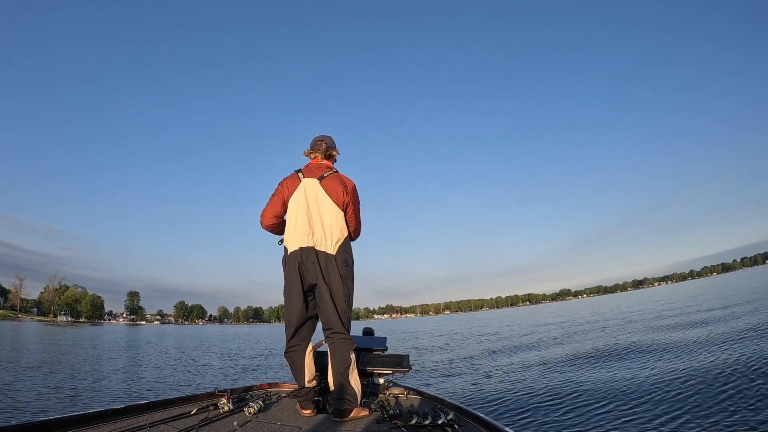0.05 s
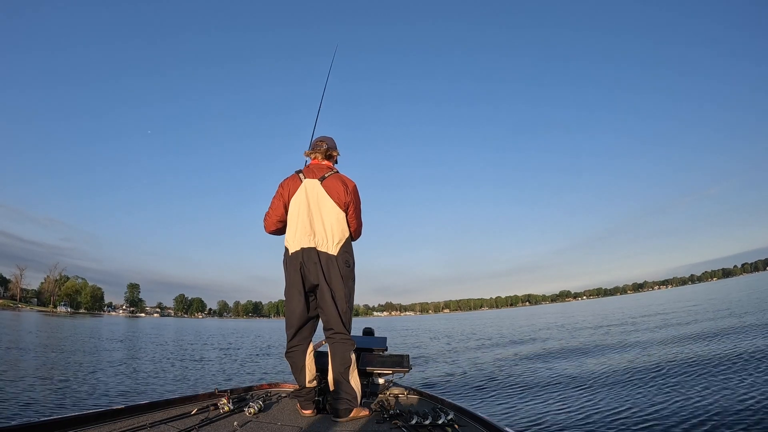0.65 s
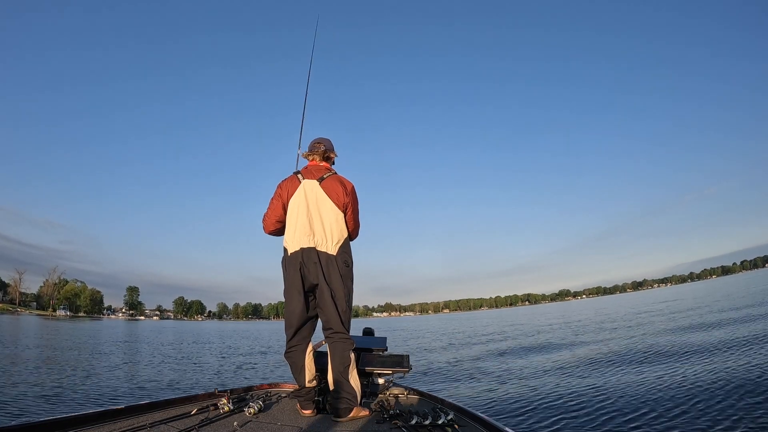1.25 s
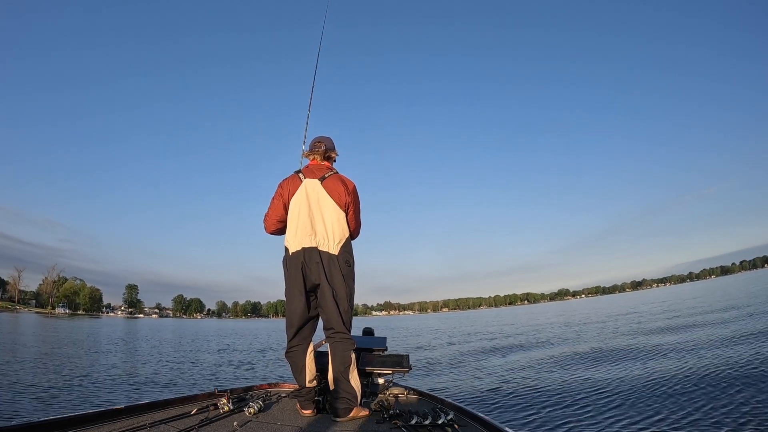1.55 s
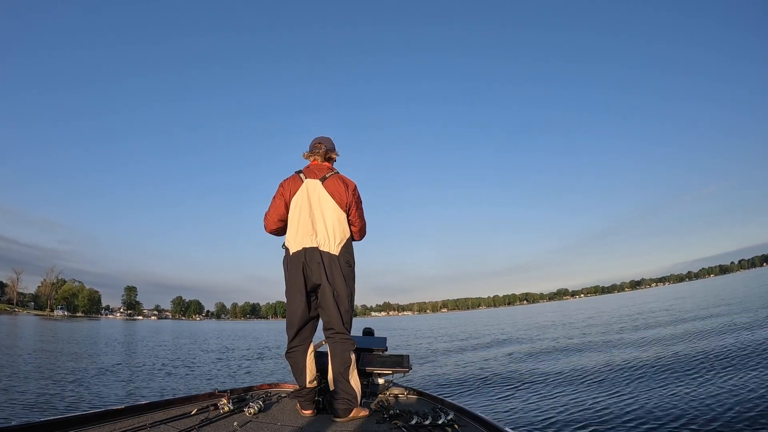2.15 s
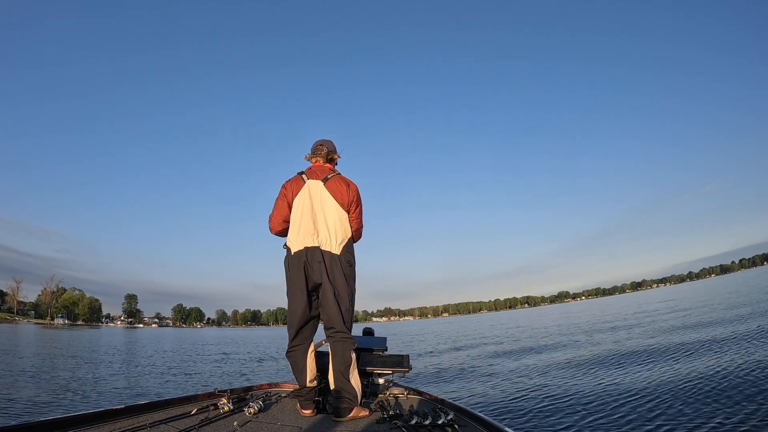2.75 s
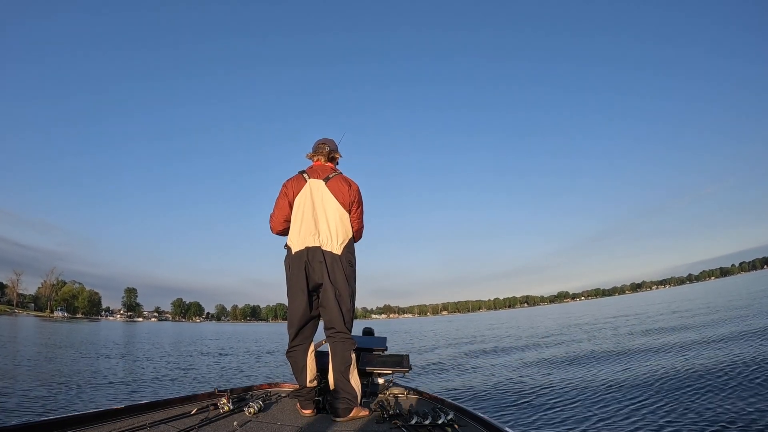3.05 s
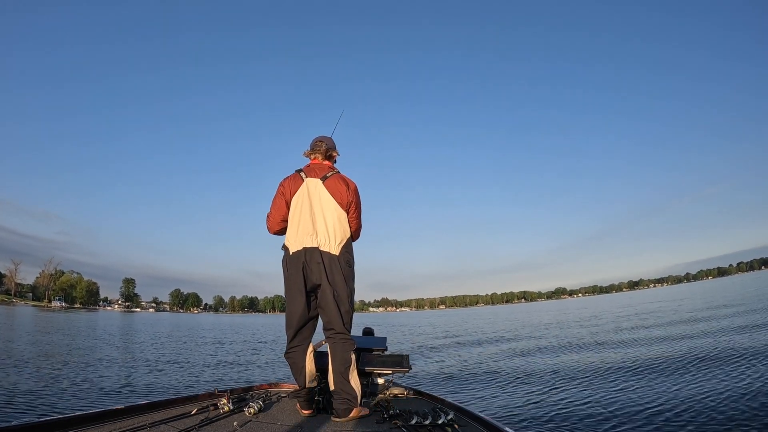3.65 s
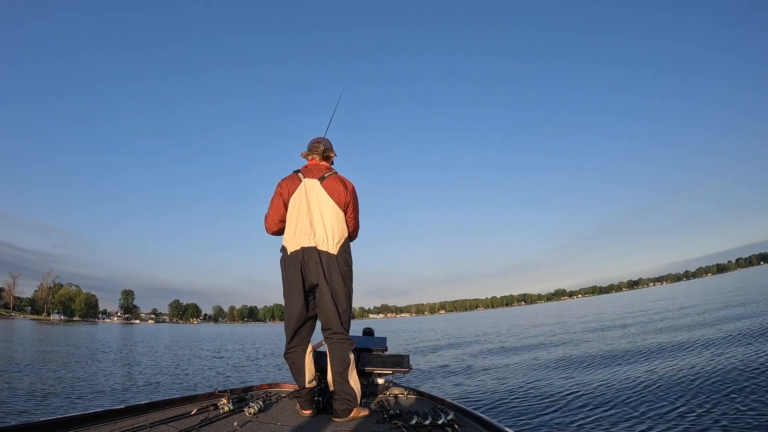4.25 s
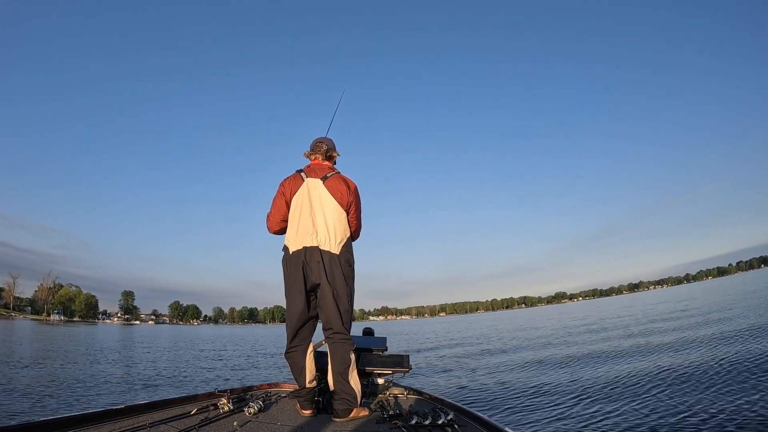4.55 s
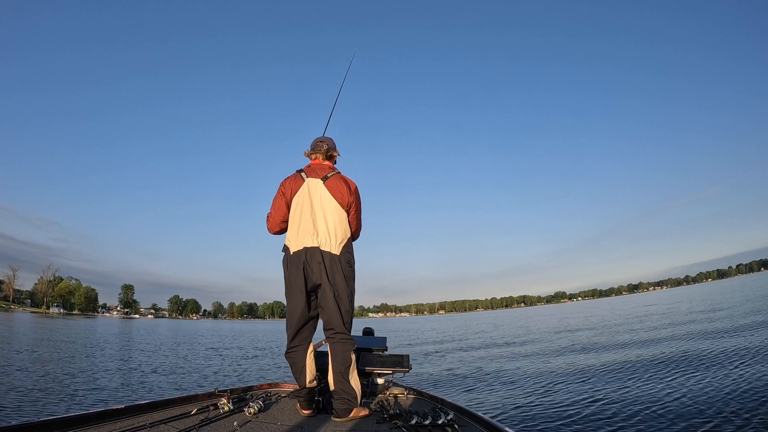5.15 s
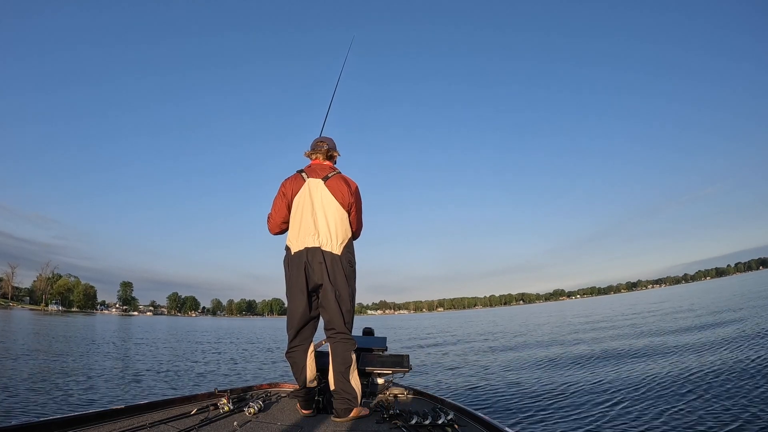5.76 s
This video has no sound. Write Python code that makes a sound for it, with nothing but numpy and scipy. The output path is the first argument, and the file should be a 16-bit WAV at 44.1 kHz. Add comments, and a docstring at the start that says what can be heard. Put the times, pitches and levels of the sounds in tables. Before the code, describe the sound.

An electric trolling motor hums with a low, throbbing tone while water rumbles beneath a small boat. Faint birds chirp and whistle from the shore. About halfway through, a dull thud and a hollow slosh hit the hull, followed by several more bumps as a fishing reel hisses softly in quick strokes. A small drip comes near the end. The microphone is on the boat, on a calm open lake.

```python
"""Trolling on a calm lake

An electric trolling motor hums under the bow of a small boat, its close tones beating in the hull.
Beneath it water rumbles and sloshes, with a few dull bumps and drips. An angler's reel hisses softly
in strokes as line slides onto the spool, and the tackle ticks. Behind it all lie an airy rush,
one far knock and small birds whose gliding whistles echo off the shore."""
import sys
import numpy as np
from scipy import signal
from scipy.fft import rfft, irfft
from scipy.io import wavfile

SR = 44100
rng = np.random.default_rng(int(sys.argv[2]) if len(sys.argv) > 2 else 0)


def transcribe(u):
    """Save the signal u as a 16-bit wav file named by the first command-line argument.

    u: samples, shape (n,) or (channels, n), limited to [-1, 1]; the rate is SR.
    q: integer samples, one column per channel.
    """
    v = np.clip(np.atleast_2d(u).T, -1, 1)
    q = np.round(v * 32767).astype(np.int16)
    wavfile.write(sys.argv[1], SR, q)


N = 264600
TIME = np.arange(N) / SR

# stereo image of the open air: (frequency [Hz], left-right likeness [0-1])
STEREO_LIKENESS = [(25, .87), (70, .99), (160, .994), (300, .978), (600, .82), (1500, .78), (4000, .6),
                   (9000, .6), (13000, .75)]
# colour of the airy bed: (frequency [Hz], relative level [dB])
RUSH_COLOUR = [(300, -8.5), (600, -5.5), (850, -1), (1100, 4), (1350, 4.5), (1600, -1.5), (1900, -4),
               (2500, -5.5), (3100, -13.5), (4000, -18), (5000, -20.5), (7500, -24), (8500, -41.5),
               (13000, -42.5)]
# colour of the rush that swells over it: (frequency [Hz], relative level [dB])
SWELL_COLOUR = [(400, -19), (700, 1), (1000, -0.5), (1300, 2.5), (1600, -2.5), (1850, -2), (2100, -6.5),
                (2450, -7), (3100, -21.5), (4500, -27.5), (8000, -40.5)]
# swells of that rush: (peak time [s], half width [s], level [dB])
RUSH_SWELLS = [(0.2, .27, -68), (4.1, 1.45, -65.3), (3.92, .27, -60.5), (4.35, .28, -65)]

# bouts of twittering on the shore: (peak time [s], half width [s], level [dB])
TWITTER_BOUTS = [(1.02, 0.085, -77), (1.42, .12, -83), (1.81, 0.034, -74.5), (2.02, .3, -87.5),
                 (2.38, .08, -82.5), (3.1, 0.044, -78), (5.5, 0.52, -80.5)]
# a nearer bird's arched chirps: (time of the top [s], rise [s], hold [s], fall [s], top pitch [Hz],
# relative level [dB], level change over the fall [dB])
NEAR_CHIRPS = [(0.568, 0.052, 0.014, 0.041, 4520, -70, 5.5), (1.266, 0.043, 0.015, 0.01, 4960, -83, -8.5),
               (1.283, .036, 0.0065, 0.017, 4560, -83, -3.5), (1.355, 0.042, 0.018, 0.02, 4580, -75.5, -4),
               (1.44, 0.036, 0, 0, 3980, -78, -2.5), (4.079, 0.024, 0.022, 0.024, 5300, -75.5, -17.5),
               (4.168, .036, 0, 0.006, 4450, -79, -3), (4.774, 0.048, 0.0058, 0.0044, 4900, -86.5, 0),
               (4.805, 0.019, .002, 0.027, 4270, -80, -8), (5.925, 0.0018, 0.0026, 0.03, 4120, -80.5, 5)]
# farther birds' slurs and pips: (time [s], length [s], first pitch [Hz], middle pitch [Hz],
# last pitch [Hz], relative level [dB])
FAR_SLURS = [(0.374, 0.09, 2415, 2257, 2050, -71.5), (0.875, 0.025, 2450, 2540, 2720, -78.5),
             (0.945, 0.085, 3280, 3220, 2850, -83), (0.966, 0.092, 2510, 2154, 2330, -72.5),
             (1.06, 0.072, 2770, 2480, 2440, -78.5), (1.318, 0.04, 3090, 2880, 2740, -83.5),
             (1.368, 0.077, 2730, 2134, 2510, -71.5), (1.482, 0.041, 2555, 2290, 2300, -71.5),
             (1.782, 0.027, 3210, 3400, 3780, -81.5), (1.787, 0.024, 2440, 2480, 2640, -71.5),
             (1.83, 0.042, 2610, 2395, 2380, -67.5), (1.844, 0.11, 3560, 3190, 2970, -83.5),
             (1.956, 0.052, 2565, 2350, 2350, -67.5), (2.01, 0.071, 2424, 2245, 2260, -74),
             (2.062, 0.034, 2860, 2970, 3110, -82), (2.132, 0.039, 2480, 2540, 2570, -77.5),
             (2.317, 0.045, 2330, 2130, 2070, -72.5), (2.33, 0.032, 2790, 2770, 2700, -78),
             (2.357, 0.05, 2660, 2627, 2640, -69), (2.397, 0.077, 2216, 2360, 2355, -76),
             (2.455, 0.089, 2430, 2204, 2260, -71.5), (3.075, 0.048, 3240, 3290, 3580, -81.5),
             (4.876, 0.093, 2850, 2800, 2750, -79), (4.887, 0.081, 2500, 2440, 2510, -77),
             (5.241, 0.033, 3550, 3740, 3750, -84), (5.33, 0.078, 2270, 2205, 2200, -78),
             (5.49, 0.04, 2584, 2230, 1900, -76), (5.531, 0.024, 3470, 3680, 3650, -80.5),
             (5.648, 0.017, 3400, 3570, 3760, -82), (5.765, 0.022, 3450, 3650, 3855, -82),
             (5.822, 0.038, 2630, 2370, 2260, -72.5), (5.856, 0.117, 2300, 2380, 2415, -80),
             (5.953, 0.058, 2760, 2350, 2280, -67)]
# resonances of the far knock: (frequency [Hz], bandwidth [Hz], t60 [s], level [dB])
KNOCK_MODES = [(1001, 40, 1.8, -67), (1144, 150, 0.42, -63)]

# drips and bubbles beside the hull: (time [s], starting pitch [Hz], t60 [s], level [dB])
BUBBLES = [(5.596, 1560, 0.06, -50), (5.613, 1130, 0.026, -58), (5.622, 1040, 0.044, -54)]
# ripples against the hull: (peak time [s], half width [s], pitch [Hz], bandwidth [Hz], level [dB])
HULL_SLOSHES = [(0.35, 0.56, 500, 99, -62.5), (2.7, 0.26, 380, 66, -51), (2.35, 0.28, 850, 190, -67.5),
                (3.15, 0.82, 680, 120, -68.5), (.42, 0.089, 1800, 340, -69.5), (3.3, .3, 1900, 700, -71.5),
                (3.89, 0.068, 1800, 320, -64.5), (5.03, 0.15, 1500, 800, -64.5)]
# colour of the water along the hull: (frequency [Hz], relative level [dB])
RUMBLE_COLOUR = [(8, -20), (20, 1), (55, 2), (110, -5.5), (165, -4), (200, -7), (235, -14), (290, -14),
                 (340, -21.5), (430, -24.5), (560, -32), (750, -44), (1200, -56.5), (3000, -90.5)]
# slow heaves of the boat: (peak time [s], half width [s], gain [dB])
BOAT_HEAVES = [(2.19, 0.13, -31.5), (3.6, 0.69, -39.5), (4.95, 0.16, -42.5), (5.75, 0.32, -36)]
# swells of the deep rumble: (peak time [s], half width [s], gain [dB])
RUMBLE_SWELLS = [(.22, 0.094, -44), (1.8, 0.062, -39.5), (2.2, 0.12, -42), (4.03, 0.098, -44),
                 (4.94, 0.13, -40.5), (5.52, 0.17, -39)]
# fader ride of the wash: (time [s], relative level [dB])
WASH_RIDE = [(0.3, -46.5), (2.59, -47.5), (3.03, -49), (4.54, -47), (5.73, -50.5), (5.77, -46.5),
             (5.9, -49.5)]
# dull bumps on the hull: (time [s], pitch [Hz], attack [s], level [dB])
HULL_BUMPS = [(2.67, 72, 0.019, -30.5), (2.696, 150, 0.012, -22.5), (2.733, 27.2, 0.033, -21.5),
              (3.353, 134, 0.0058, -22), (4.008, 159, 0.0038, -23.5), (4.457, 166.4, 0.012, -23.5),
              (4.905, 70.7, 0.012, -25.5), (4.91, 156, 0.0095, -24.5)]

# sharp ticks of the tackle: (time [s], centre frequency [Hz], t60 [s], level [dB])
TACKLE_TICKS = [(0.425, 5700, 0.018, -63), (1.217, 6300, .035, -71.5), (3.412, 3200, .028, -59),
                (4.468, 3400, .025, -58.5)]
# colour of slow-running line: (frequency [Hz], relative level [dB])
LINE_COLOUR = [(1500, -10), (3000, 0.5), (4200, -2), (5500, -1), (7400, -1), (8600, -7.5), (10500, -9.5),
               (12400, -10.5), (13500, -21.5), (15000, -36.5)]
# brighter colour of a quick stroke: (frequency [Hz], relative level [dB])
SWISH_COLOUR = [(2000, -2.5), (4200, -1.5), (5500, -1.5), (7300, 2.5), (8700, -0.5), (10500, -3),
                (12400, -8), (13300, -17), (15000, -21.5)]
# spells of running line: (start [s], end [s], level [dB])
LINE_SPELLS = [(-0.1, .43, -75.5), (.43, 1.7, -93), (1.7, 2.58, -83.5), (3.353, 5.1, -79.8),
               (5.1, 6.2, -81.8)]
# reel strokes, about seven a second: (peak time [s], half width [s], level [dB], extra treble [dB])
REEL_STROKES = [(3.41, .04, -79, 0), (3.5, 0.026, -67.5, 1), (3.605, .03, -72.5, -1),
                (3.66, 0.032, -70.5, 0), (3.815, 0.032, -69.5, 0), (3.94, .042, -74, 0),
                (4.085, 0.025, -69, 0), (4.245, 0.052, -70, 1), (4.38, 0.036, -70.5, -1),
                (4.51, 0.045, -72.5, 0), (4.65, .035, -74, 0), (4.76, 0.03, -78, -2),
                (4.905, .032, -72.5, 0), (5.06, 0.04, -72.5, 1), (5.197, .016, -72, -2),
                (5.28, .03, -80, -2), (5.43, .035, -78.5, -1), (5.56, .03, -81, -1), (5.745, .025, -79, -2),
                (5.87, .04, -77, -1), (5.97, .03, -78, -1)]
# line swishing as the rod moves: (peak time [s], half width [s], gain [dB])
ROD_MOVES = [(0.19, 0.046, -88), (0.345, 0.043, -67), (2.24, 0.093, -79)]

# weaker, unsteady tones of the drive: (pitch [Hz], bandwidth [Hz], level [dB])
DRIVE_DRONES = [(72, 17, -46.5), (94.2, 11, -49), (286.6, 3.6, -60.5), (345.6, 6.1, -63)]
# spells of louder whine: (start [s], end [s], level [dB])
WHINE_LIFTS = [(0.05, 2.65, -57), (3.9, 5.12, -56.5)]
# close tones of the motor in the hull: (pitch [Hz], resting level [dB])
MOTOR_TONES = [(143.04, -47), (157.5, -50), (166.3, -50), (173.95, -46), (152.4, -59), (133, -53.5),
               (185.7, -51.5), (70.07, -58.5)]
# spells in which one tone swells: (tone [index from 0], start [s], end [s], level [dB])
TONE_LIFTS = [(0, 0.24, 3.0, -47.5), (2, -2, 2.03, -40), (3, 0.5, 2.77, -42), (2, 3, 2.89, -43.5),
              (4, 0.4, 2.9, -50), (3, 3, 4.48, -45.5), (2, 3.5, 4.6, -51), (1, 4, 5.6, -45),
              (0, 4.5, 6.3, -42.5), (7, 0.2, 3.1, -48)]


def gain_of(db):
    """Decibels to amplitude."""
    return 10 ** (np.asarray(db) / 20)


def unit_rms(x):
    """Scales to rms 1."""
    return x / np.sqrt(np.mean(np.abs(x) ** 2) + 1e-30)


def at_hz(points, hz):
    """Reads a table on a log-frequency axis."""
    f, value = np.transpose(points)
    return np.interp(np.log(hz + 1), np.log(f + 1), value)


def add(mix, s, sound):
    """Mixes a sound in at time s."""
    part = mix[max(round(s * SR), 0):][:len(sound)]
    part += sound[:len(part)]


def pan(left_db):
    """Channel gains that put the left side left_db above the right."""
    return gain_of([[left_db / 2], [-left_db / 2]])


def lowpass(x, cutoff_hz):
    """A smooth treble cut, 24 dB an octave."""
    return signal.sosfiltfilt(signal.butter(2, cutoff_hz, fs=SR, output="sos"), x)


def swells(rows, size=6000):
    """Envelope of bell-shaped swells: (peak time [s], half width [s], level [dB])."""
    t = np.linspace(0, N / SR, size)
    bells = sum(gain_of(db) * np.exp(-np.minimum(((t - s) / half) ** 2, 20)) for s, half, db in rows)
    return np.interp(TIME, t, bells)


def spells(rows, fade_s):
    """Envelope of spells that fade in, hold and fade out: (start [s], end [s], level [dB])."""
    return sum(gain_of(db) * np.clip(np.minimum(TIME - start, end - TIME) / fade_s + .5, 0, 1)
               for start, end, db in rows)


def wander(rate_hz, size=8820):
    """Smooth random modulation of rms 1, moving at up to about rate_hz."""
    hz = np.fft.rfftfreq(size, N / SR / size)
    slow = irfft(rfft(rng.standard_normal(size)) * np.exp(-(hz / rate_hz) ** 2), size)
    return np.interp(TIME, np.linspace(0, N / SR, size), unit_rms(slow))


def fuzzy_tone(hz, width_hz):
    """A narrow band of noise around one pitch, rms 1."""
    sway = wander(width_hz) + 1j * wander(width_hz)
    return unit_rms((sway * np.exp(2j * np.pi * hz * TIME)).real)


def noise(colour):
    """Coloured stereo noise of rms 1, nearly mono in the bass."""
    hz = np.fft.rfftfreq(N, 1 / SR)
    mid, side = rfft(rng.standard_normal((2, N)))
    likeness = at_hz(STEREO_LIKENESS, hz)
    mid, side = mid * np.sqrt(1 + likeness), side * np.sqrt(1 - likeness)
    spectrum = np.array([mid + side, mid - side]) * gain_of(at_hz(colour, hz))
    return unit_rms(irfft(spectrum, N))


def lake_echo(x, early_t60=0.047, shore_t60=0.33, shore_db=-9, likeness=0.59):
    """Scattered echoes: a quick cluster and a faint tail from the shore, partly alike left and right."""
    t = np.arange(SR) / SR
    centre = np.sqrt(likeness) * rng.standard_normal(SR)
    sides = np.sqrt(1 - likeness) * rng.standard_normal((2, SR))
    decay = gain_of(shore_db - 60 * t / shore_t60) + gain_of(-60 * t / early_t60)
    tail = (centre + sides) * decay
    return signal.fftconvolve(x[None], tail / np.linalg.norm(tail[0]), axes=1)[:, :N]


def rush(rest_db=-66.5, flicker_db=1.16):
    """A soft airy bed, with a second rush that swells and recedes over it."""
    air = noise(RUSH_COLOUR) * gain_of(rest_db) + noise(SWELL_COLOUR) * swells(RUSH_SWELLS)
    return air * gain_of(flicker_db * wander(30)) * pan(left_db=2)


def shore_twitter(count=200, low_hz=2300, high_hz=3700, glide=0.07, rest_db=-86):
    """Many birds along the shore: short gliding pips, blurred by echoes."""
    pips = np.zeros(N)
    for when, height, slope, span in rng.random((count, 4)):
        u = np.linspace(-1, 1, round((0.026 + 0.13 * span) * SR))
        hz = low_hz * (high_hz / low_hz) ** height * (1 + glide * (2 * slope - 1) * u)
        pip = np.hanning(len(u)) * np.sin(2 * np.pi * np.cumsum(hz) / SR)
        add(pips, when * N / SR, pip / (1 + 2 * height))
    return (gain_of(rest_db) + swells(TWITTER_BOUTS)) * unit_rms(lake_echo(pips))


def slurs(echo_db=-1):
    """Far notes bend through three pitches: (time [s], pitch curve [Hz], level [dB], echo send [dB])."""
    for s, length, first_hz, middle_hz, last_hz, db in FAR_SLURS:
        bend = np.polyfit([-1, 0, 1], [first_hz, middle_hz, last_hz], 2)
        yield s, np.polyval(bend, np.linspace(-1, 1, round(length * SR))), db, echo_db


def chirps(foot_hz=3230, sag_hz_per_s=7500, fade_db_per_s=39.5, echo_db=-2.5):
    """Nearer notes sweep up from a common foot, linger and fall; same columns as the slurs."""
    for s, rise, hold, fall, top_hz, db, fall_db in NEAR_CHIRPS:
        up, held, down = (np.linspace(0, 1, round(span * SR)) for span in (rise, hold, fall))
        climb, drop = np.sin(up ** 2.4 * np.pi / 2), np.cos(down * np.pi / 2) ** 1.5
        arch = np.concatenate([climb, np.ones(len(held)), drop])
        past_top_s = np.maximum(np.arange(len(arch)) / SR - rise, 0)
        arc_hz = foot_hz + (top_hz - sag_hz_per_s * past_top_s - foot_hz) * arch
        fallen = np.concatenate([np.zeros(len(up) + len(held)), np.sqrt(down)])
        yield s - rise, arc_hz, db - fade_db_per_s * past_top_s + fall_db * fallen, echo_db


def birds(trim_db=1.5, quaver=0.0057, flutter_db=2.5, db_per_octave=5):
    """Each note is a near-pure whistle gliding along a smooth arc, with its echo off the lake."""
    direct, send = np.zeros((2, N))
    pitch = 1 + quaver * wander(250)
    flutter = gain_of(flutter_db * wander(90))
    for s, arc_hz, db, echo_db in [*chirps(), *slurs()]:
        at = (round(s * SR) + np.arange(len(arc_hz))) % N
        whistle = np.sin(2 * np.pi * np.cumsum(arc_hz * pitch[at]) / SR) * flutter[at]
        # higher whistles are played louder
        note_db = db + trim_db + db_per_octave * np.log2(arc_hz / 2400)
        note = gain_of(note_db) * unit_rms(whistle * signal.windows.tukey(len(at), 0.14))
        add(direct, s, note)
        add(send, s, gain_of(echo_db) * note)
    return direct + lake_echo(send)


def knock(start_s=1.24, attack_s=0.0082):
    """A distant knock, softened by the air, with one lingering ring."""
    t = np.maximum(TIME - start_s, 0)
    ring = sum(gain_of(db - 60 * t / t60) * fuzzy_tone(hz, width) for hz, width, t60, db in KNOCK_MODES)
    return (1 - np.exp(-t / attack_s)) * ring


def drips(climb=0.44, attack_s=0.0013):
    """Each bubble rings briefly and climbs in pitch as it nears the surface."""
    out = np.zeros(N)
    for s, hz, t60, db in BUBBLES:
        t = np.arange(round(t60 * SR)) / SR
        turns = np.cumsum(hz * (1 + climb * t / t60)) / SR
        envelope = gain_of(db - 60 * t / t60) * (1 - np.exp(-t / attack_s))
        add(out, s, envelope * np.sin(2 * np.pi * turns))
    return out


def slosh():
    """Water trapped against the hull rings with a broad, hollow note."""
    return sum(fuzzy_tone(hz, width) * swells([(s, half, db)])
               for s, half, hz, width, db in HULL_SLOSHES)


def water(heave_hz=46, deep_hz=230, heave_rest_db=-47, deep_rest_db=-33.5, wash_trim_db=14.5):
    """Turbulence under the hull: slow heave, deep rumble and the wash above them swell separately."""
    flow = noise(RUMBLE_COLOUR)
    deep, heave = lowpass(flow, deep_hz), lowpass(flow, heave_hz)
    wash_db = np.interp(TIME, *np.transpose(WASH_RIDE)) + wash_trim_db
    return (heave * (gain_of(heave_rest_db) + swells(BOAT_HEAVES))
            + (deep - heave) * (gain_of(deep_rest_db) + swells(RUMBLE_SWELLS))
            + (flow - deep) * gain_of(wash_db))


def bumps():
    """Each push on the hull is a dull thud that swells and dies within a few cycles."""
    out, t = np.zeros(N), np.arange(SR // 2) / SR
    for s, hz, attack_s, db in HULL_BUMPS:
        envelope = (t / attack_s * np.exp(1 - t / attack_s)) ** 2
        add(out, s, gain_of(db) * envelope * np.sin(2 * np.pi * hz * t))
    return out


def ticks(spread=1.15, attack_s=0.001):
    """Each tick of the tackle is a dry noise burst, a fraction of an octave wide."""
    out, t = np.zeros(N), np.arange(SR // 10) / SR
    for s, hz, t60, db in TACKLE_TICKS:
        band = signal.butter(2, [hz / spread, hz * spread], "bandpass", fs=SR, output="sos")
        burst = unit_rms(signal.sosfilt(band, rng.standard_normal(len(t))))
        add(out, s, burst * gain_of(db - 60 * t / t60) * (1 - np.exp(-t / attack_s)))
    return out


def reel(rest_db=-92, treble_hz=8000, thin_hz=5500):
    """Line slides onto the spool in a grainy hiss that surges with each stroke; the rod adds swishes."""
    swish = noise(SWISH_COLOUR)
    body = lowpass(swish, treble_hz)
    hiss = noise(LINE_COLOUR) * (gain_of(rest_db) + spells(LINE_SPELLS, fade_s=0.092))
    hiss += body * swells([(s, half, db) for s, half, db, _ in REEL_STROKES])
    hiss += (swish - body) * swells([(s, half, db + extra) for s, half, db, extra in REEL_STROKES])
    rod = (swish - lowpass(swish, thin_hz)) * swells(ROD_MOVES)
    rustle_db, grain_db = 1.1 * wander(40), 1.5 * wander(250)
    return (hiss * pan(left_db=5) + rod * pan(left_db=3)) * gain_of(rustle_db + grain_db)


def whine(hz=298, drift_hz=2, rest_db=-65, waver_db=3):
    """A thin motor tone above the hum, wavering in pitch and level."""
    turns = np.cumsum(hz + drift_hz * wander(12)) / SR
    level = gain_of(rest_db) + spells(WHINE_LIFTS, fade_s=0.2)
    return level * gain_of(waver_db * wander(13)) * unit_rms(np.sin(2 * np.pi * turns))


def motor(first_throb_s=0.1, drift_hz=0.13, flutter=0.034, trim_db=0.2, surge_db=1.0):
    """Close tones drift together and beat, throbbing about seven times a second amid looser drones."""
    hum = np.zeros(N)
    drift = np.cumsum(drift_hz * wander(0.78)) / SR + rng.random()
    for k, (hz, rest_db) in enumerate(MOTOR_TONES):
        lifts = [row for index, *row in TONE_LIFTS if index == k]
        level = gain_of(rest_db) + spells(lifts, fade_s=0.2)
        tone = unit_rms(np.sin(2 * np.pi * (hz * (TIME - first_throb_s) + drift)))
        hum += level * (1 + flutter * wander(10)) * tone
    hum *= gain_of(trim_db + surge_db * wander(14))  # some throbs come harder than others
    return hum + whine() + sum(gain_of(db) * fuzzy_tone(hz, width) for hz, width, db in DRIVE_DRONES)


def scene():
    """Motor and water hold the centre; the small, high sounds lean to the left."""
    details = birds() + shore_twitter() + drips() + ticks() + knock()
    return motor() + water() + slosh() + bumps() + rush() + reel() + details * pan(left_db=4)


def record(dry, cutoff_hz=14300):
    """A steep high cut takes the very top off the mix."""
    high_cut = signal.firwin(255, cutoff_hz, window=("kaiser", 8), fs=SR)
    return signal.oaconvolve(dry, high_cut[None], "same")


dry = scene()
out = record(dry)
transcribe(out)
```